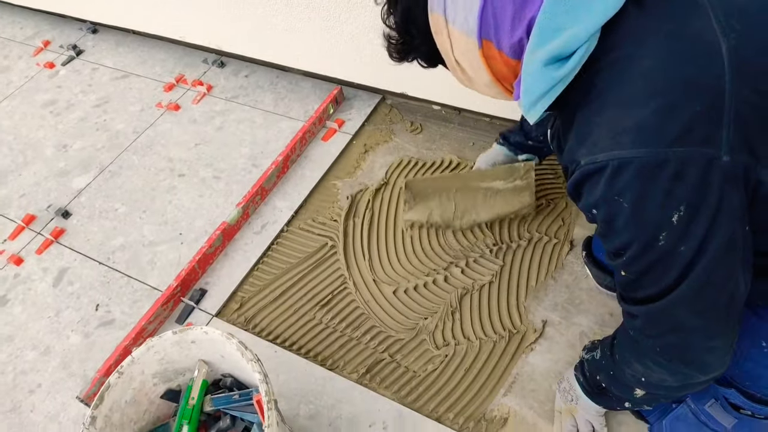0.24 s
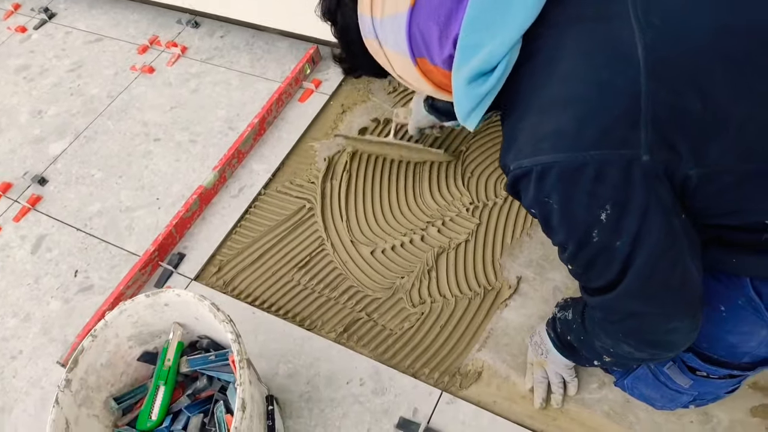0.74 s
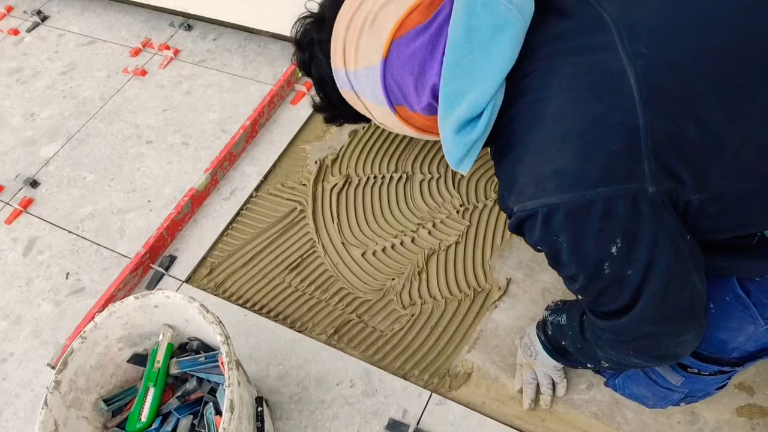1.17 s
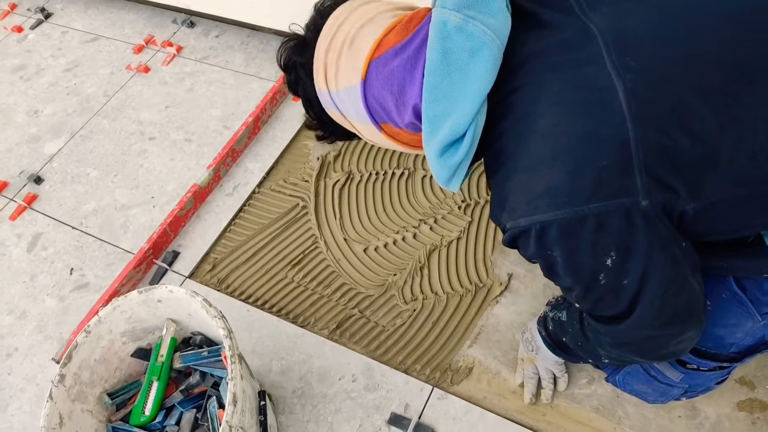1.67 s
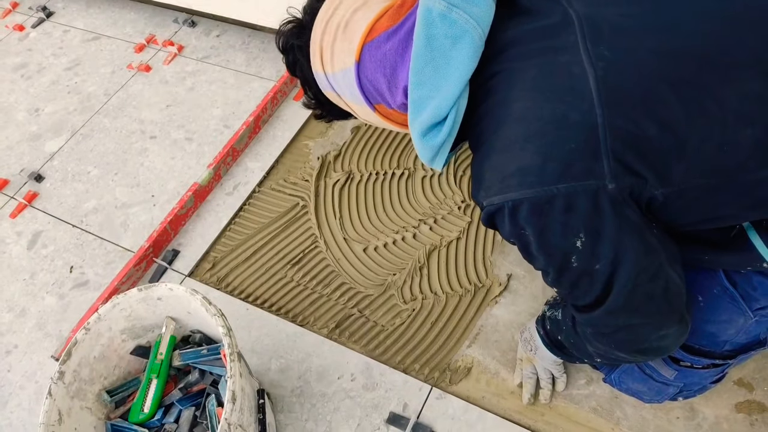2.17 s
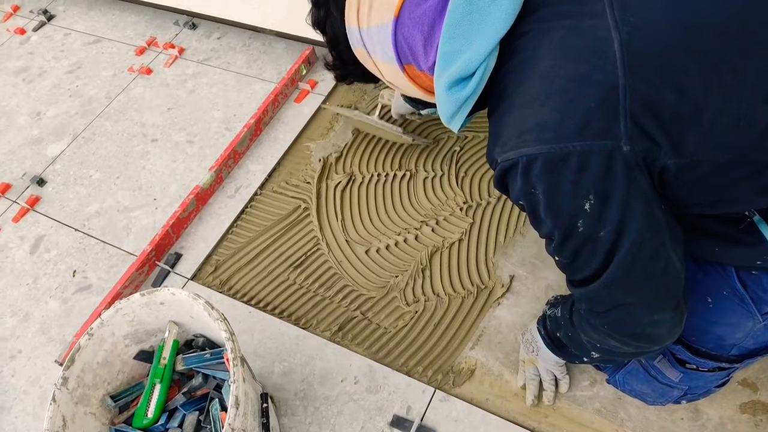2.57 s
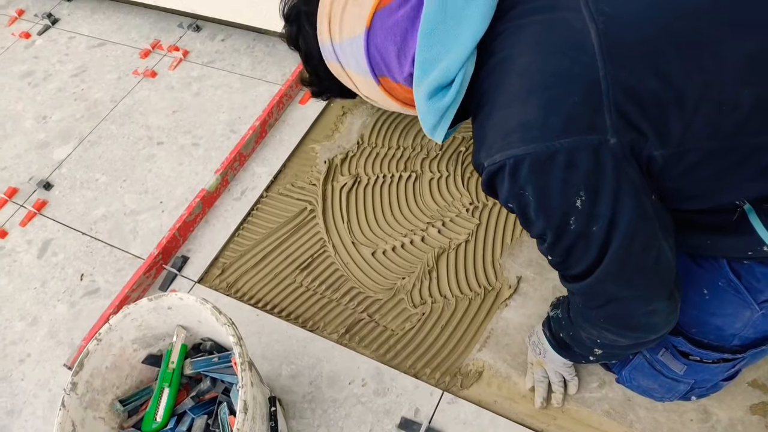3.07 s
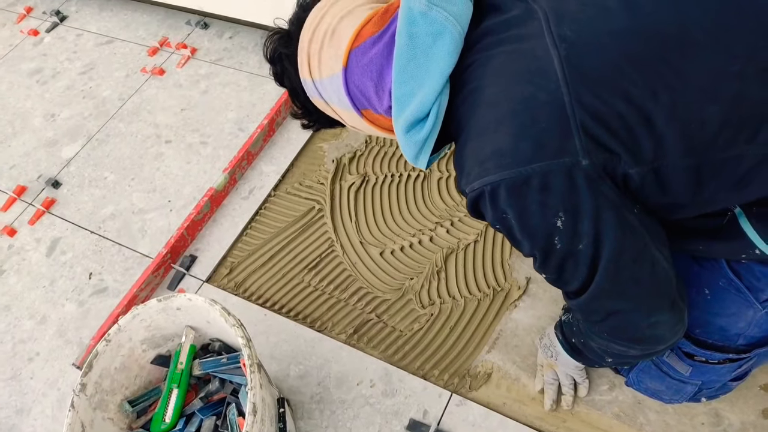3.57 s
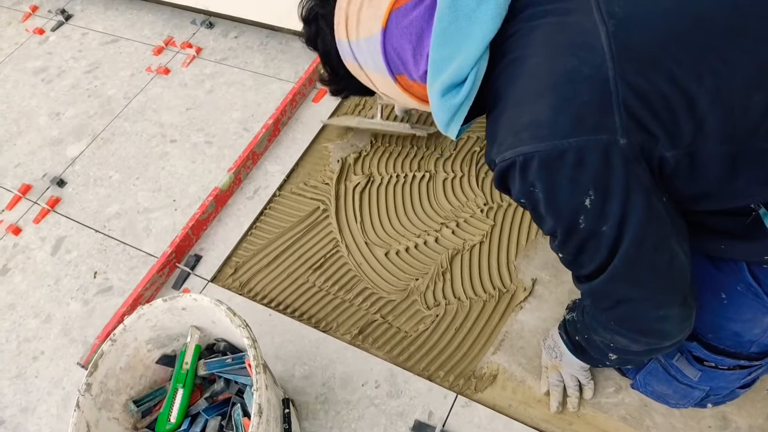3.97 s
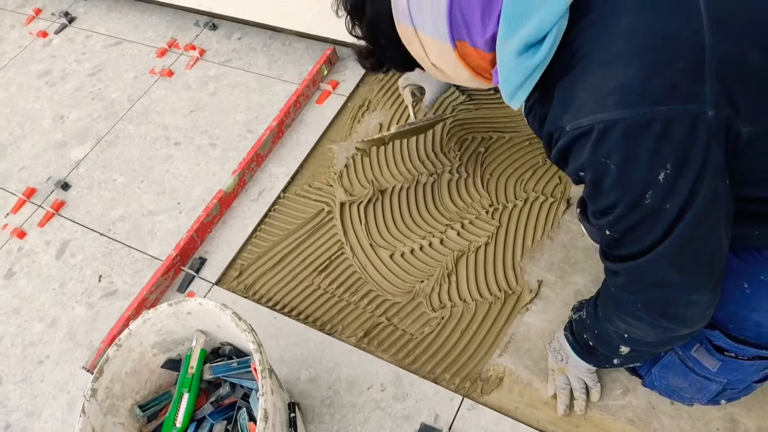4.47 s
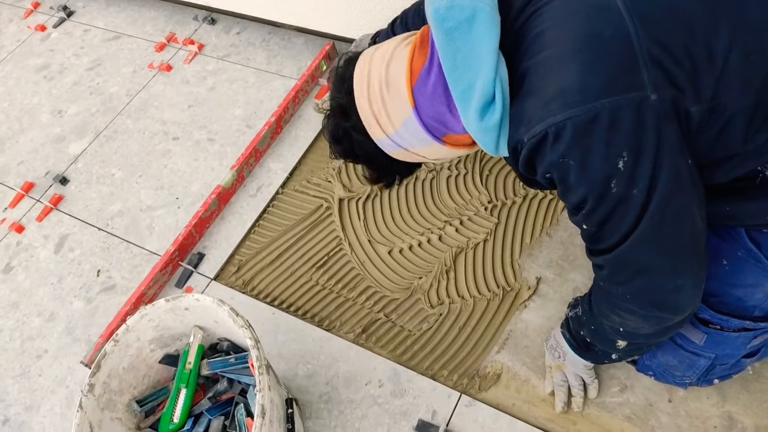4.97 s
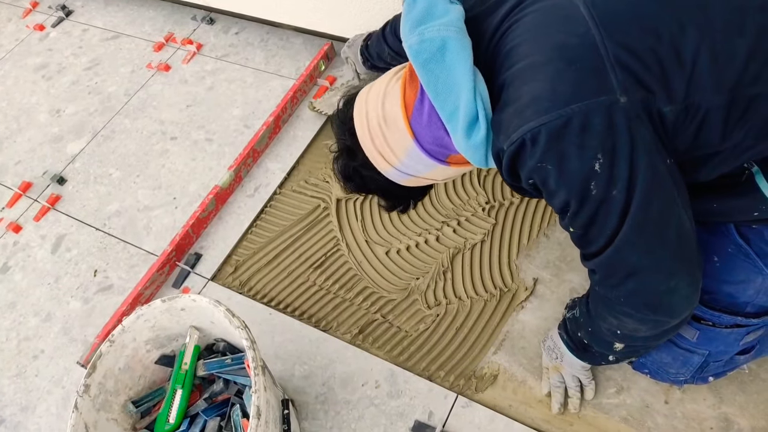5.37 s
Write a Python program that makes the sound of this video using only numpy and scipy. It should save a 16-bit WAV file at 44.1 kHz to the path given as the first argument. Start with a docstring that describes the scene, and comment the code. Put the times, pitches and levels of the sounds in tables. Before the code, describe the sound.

Sandy scraping comes in four short strokes as a toothed steel trowel spreads cement adhesive nearby, outdoors with a little echo off walls. Two strokes come first, then a pause, then two more separated by damped metal taps and scuffs. Soft low thuds accompany some taps and cluster near the end, after the teeth brush lightly over the paste. Far traffic hums underneath, with one engine briefly accelerating.

```python
"""Outdoors on a concrete floor, a two-port microphone close to a notched steel trowel, traffic far behind.
Two strokes comb gritty cement adhesive: sand hisses under the teeth, rings the blade and flexes it,
and nearby walls echo the scraping. From 1.5 to 3.1 s one engine climbs in pitch; the trowel is tapped
down at 2 s and combs again. More taps lead to a fourth stroke at 4 s, then the teeth graze lightly.
Something padded bumps the floor along with some of the taps, and several times more after 5 s."""
import sys
import numpy as np
from scipy import signal
from scipy.fft import rfft, irfft
from scipy.io import wavfile
from scipy.ndimage import uniform_filter1d

SR = 44100
rng = np.random.default_rng(int(sys.argv[2]) if len(sys.argv) > 2 else 0)


def generate_wav(signal):
    """Clip the signal to [-1, 1] and save it as 16-bit WAV at the path in sys.argv[1]."""
    frames = np.transpose(np.atleast_2d(signal))
    scaled = np.clip(frames, -1, 1) * 32767
    pcm = np.round(scaled).astype(np.int16)
    wavfile.write(sys.argv[1], SR, pcm)


N = 248283


def gain_of(db):
    return 10 ** (np.asarray(db) / 20)


def unit_rms(x):
    return x / np.sqrt(np.mean(x ** 2) + 1e-20)


def curve_at(points, hz):
    """Interpolates (hz, value) points over log frequency."""
    point_hz, value = np.transpose(points)
    return np.interp(np.log(hz + 1), np.log(point_hz + 1), value)


def envelope(rows, db):
    """Gain through one level at each row's time, silent outside the rows."""
    return gain_of(np.interp(np.arange(N) / SR, np.transpose(rows)[0], db, left=-200, right=-200))


def wander(samples):
    """Smooth random drift, rms 1."""
    span = round(samples)
    return unit_rms(uniform_filter1d(uniform_filter1d(rng.standard_normal(N), span), span))


def coloured(x, points):
    """Filters by an (hz, db) curve scaled to unit energy."""
    hz = np.fft.rfftfreq(1024, 1 / SR)
    kernel = np.roll(irfft(gain_of(curve_at(points, hz))), 512) * np.hanning(1024)
    return signal.oaconvolve(x, kernel[None] / np.linalg.norm(kernel), "same")


def ringing(modes, favoured_hz=None, reach=0.3, size=4096):
    """Modes swell over a few cycles and decay, energy 1; a blow favours those near one pitch."""
    t = np.arange(size) / SR
    hz, width, db = np.transpose(modes)[:, :, None]
    share = 1 if favoured_hz is None else np.exp(-(np.log(hz / favoured_hz) / reach) ** 2)
    decay = np.exp(-np.pi * width * t)
    amplitude = share * gain_of(db) * np.sqrt(width) * decay * (1 - decay ** 3)
    ring = (amplitude * np.sin(2 * np.pi * hz * t)).sum(0)
    return ring / np.linalg.norm(ring)


def resonate(clicks, modes):
    """Each click rings the modes."""
    return signal.oaconvolve(clicks, ringing(modes)[None])[:, :N]


def add(mix, start_s, sound):
    part = mix[..., round(start_s * SR):][..., :sound.shape[-1]]
    part += sound[..., :part.shape[-1]]


def knocks(events):
    """Places each blow at its time and peak level."""
    track = np.zeros(N)
    for start_s, peak_db, shape in events:
        add(track, start_s, gain_of(peak_db) * shape / abs(shape).max())
    return track


# spectrum of the far traffic: frequency_hz, relative_db
TRAFFIC_SPECTRUM = [(20, -8), (50, 0.5), (68, -14.5), (91, -21), (185, -6), (223, -13), (326, -16),
                    (540, -17.5), (700, -23), (1170, -24.5), (2000, -29.5), (3840, -42.5), (5300, -46),
                    (7560, -40.5), (13000, -72.5)]
def traffic(level_db=-47, patch_db=1.3):
    """Far traffic rumbles: low noise whose colour drifts in patches."""
    frames, hz = N // 512 + 5, np.fft.rfftfreq(2048, 1 / SR)
    *noise, patches = rng.standard_normal((frames, 1025, 5)).T
    patches = unit_rms(uniform_filter1d(uniform_filter1d(patches, 20, 0), 10, 1))
    spectra = np.array([noise[0] + 1j * noise[1], noise[2] + 1j * noise[3]])
    spectra *= gain_of(curve_at(TRAFFIC_SPECTRUM, hz)[:, None] + patch_db * patches)
    return gain_of(level_db) * unit_rms(signal.istft(spectra, nperseg=2048, noverlap=1536)[1][:, :N])


# one engine accelerating in the traffic: time_s, firing_hz, level_db
ENGINE_CLIMB = [(1.5, 39.9, -70), (1.73, 42.56, -58.5), (2.578, 52.43, -45.5), (3.042, 60, -50),
                (3.119, 60.5, -69)]
def engine(second_harmonic_db=-11):
    """A low firing tone and its octave climb in pitch."""
    time_s, firing_hz, level_db = np.transpose(ENGINE_CLIMB)
    phase = 2 * np.pi * np.cumsum(np.interp(np.arange(N) / SR, time_s, firing_hz)) / SR
    swell = uniform_filter1d(envelope(ENGINE_CLIMB, level_db), 3000)
    return np.sqrt(2) * swell * (np.sin(phase) + gain_of(second_harmonic_db) * np.sin(2 * phase))


# colour of the echo off nearby walls: frequency_hz, relative_db
ECHO_COLOUR = [(300, -0.5), (1000, 0.5), (2000, 3), (3300, 0.5), (7500, -4.5), (12000, -9.5)]
def wall_echo(x, level_db=-17, t60_s=0.8, gap_s=0.0099):
    """The walls throw the scraping back as a diffuse, dying tail."""
    t = np.arange(SR) / SR
    tail = rng.standard_normal((2, SR)) * gain_of(-60 * t / t60_s) * (t > gap_s)
    echo = signal.fftconvolve(x, tail / np.linalg.norm(tail[0]), axes=1)[:, :N]
    return gain_of(level_db) * coloured(echo, ECHO_COLOUR)


# modes of a padded bump: pitch_hz, width_hz, relative_db
BUMP_MODES = [(78, 25, 28), (151.6, 13.2, 21), (253, 57, 12), (344, 36, 8)]
# bumps on the floor, alike at both ports: start_s, peak_db, favoured_hz
FLOOR_BUMPS = [(1.994, -35.5, 196), (3.171, -32, 80), (3.68, -33, 79.5), (5.195, -27.5, 385),
               (5.205, -21, 241), (5.223, -36, 145), (5.24, -31.5, 211), (5.427, -37.5, 173),
               (5.444, -36, 181)]
def padded_bumps():
    """Soft blows on the floor ring low and short."""
    return knocks([(s, db, ringing(BUMP_MODES, hz, reach=0.42)) for s, db, hz in FLOOR_BUMPS])


def steel_blow(hz, crack_gain=0.35, crack_s=0.003):
    """A blow stirs many neighbouring modes, which die at once; those nearest its pitch ring on."""
    modes = FLEX_MODES + RING_MODES + RASP_MODES + BITE_MODES
    crack = ringing(modes, hz, reach=0.35, size=512) * np.exp(-np.arange(512) / SR / crack_s)
    blow = ringing(modes, hz, reach=0.036)
    add(blow, 0, crack_gain * crack / np.linalg.norm(crack))
    return blow


# the blade edge meets the floor or catches on it: start_s, skid_db, skid_s, peak_db, favoured_hz
EDGE_TAPS = [(0.134, -55, .003, -36, 340), (0.161, -55, .003, -30, 925), (0.602, -55, 0.0067, -34.5, 480),
             (0.774, -55, .003, -24.5, 290), (0.804, -55, .003, -27, 290), (0.8, -50, .003, -23, 630),
             (0.818, -52, .003, -22, 940), (0.833, -55, .003, -20.5, 920), (0.845, -48, .003, -26, 300),
             (1.971, -44, 0.0031, -29.5, 2400), (1.972, -58, .003, -26.5, 534),
             (1.98, -47, 0.0056, -25, 2046), (1.987, -64, .003, -33, 556), (1.993, -63, 0.0045, -31, 2200),
             (2.024, -63, .003, -36, 923), (2.05, -63, 0.0033, -34, 556), (2.09, -52, .003, -32, 891),
             (2.096, -66, 0.0033, -40, 940), (2.108, -70, .003, -40, 860), (2.402, -56, .003, -30, 480),
             (2.418, -40, 0.0015, -36, 366), (2.427, -55, .003, -31, 366), (2.701, -52, .003, -37, 285),
             (2.708, -52, .003, -25.5, 285), (2.729, -47, .003, -24, 630), (2.746, -50, .003, -27, 850),
             (2.755, -53, .003, -28, 1000), (2.776, -52, .003, -27.5, 630), (2.784, -50, .003, -29, 1000),
             (2.804, -55, .003, -27, 1010), (3.163, -52, 0.0045, -36, 710), (3.171, -40, 0.0018, -26, 960),
             (3.1802, -30.5, 0.0032, -23.5, 354), (3.193, -32, 0.0028, -36, 3900),
             (3.22, -42, .003, -24.5, 334), (3.247, -55, .003, -28, 1940), (3.248, -58, .003, -30, 1940),
             (3.332, -39, 0.014, -53, 1950), (3.574, -60, 0.0069, -36, 980), (3.673, -56, 0.0044, -30, 406),
             (3.676, -44.5, 0.0033, -38, 2170), (3.687, -39, 0.0057, -26, 360),
             (3.694, -50, .003, -35, 290), (3.737, -52, .003, -28, 360),
             (3.755, -45.5, 0.0044, -27.5, 1940), (4.029, -53, .003, -31, 300),
             (4.081, -50, .003, -26, 730), (4.109, -48, .003, -26, 855), (4.154, -50, .003, -27.5, 625),
             (5.259, -66, .003, -35, 740)]
def taps(left_lead_s=0.00031):
    """Single blows ring the blade, nearer the left port."""
    blows = knocks([(s, db, steel_blow(hz)) for s, _, _, db, hz in EDGE_TAPS])
    return np.array([blows, np.roll(blows, round(left_lead_s * SR))])


def skids(tick_gain=2.2, tick_s=0.002):
    """Each tap's skid envelope, and its first click of steel, sharpest when the skid is short."""
    skid, tick = np.zeros((2, N))
    t = np.arange(2600) / SR
    for start_s, db, skid_s, _, _ in EDGE_TAPS:
        add(skid, start_s, gain_of(db - 20 * (t / skid_s) ** 2))
        tick[round(start_s * SR)] = gain_of(db) * tick_gain * min(tick_s / skid_s, 1)
    return skid, tick


def grains(per_s, spread_db, chatter_db, chatter_samples):
    """Two unrelated trains of sand clicks of uneven size, clumped as the teeth chatter."""
    hit = rng.random((2, N)) < per_s / SR
    sign = rng.choice([-1., 1.], (2, N))
    size = np.minimum(rng.exponential(1, (2, N)), 5)
    return unit_rms(hit * sign * gain_of(spread_db * size + chatter_db * wander(chatter_samples)))


def patchy(x, depth_db):
    """The colour flickers in brief, random patches."""
    spectra = signal.stft(x, nperseg=512, noverlap=384)[2]
    patches = rng.standard_normal(spectra.shape[::-1][:2])
    patches = unit_rms(uniform_filter1d(uniform_filter1d(patches, 16, 0), 3, 1)).T
    return signal.istft(spectra * gain_of(depth_db * patches), nperseg=512, noverlap=384)[1][:, :N]


def bent(clicks, modes, bend=0.018, drift_s=0.04):
    """Wandering hand pressure bends the blade: neighbouring modes draw together and apart."""
    hz, width, db = np.transpose(modes)
    pressure = 1.59 * wander(drift_s * SR)
    shift = bend * (-1.) ** np.arange(len(hz))
    one_way = resonate(clicks * np.cos(pressure), np.c_[hz * (1 + shift), width, db])
    other_way = resonate(clicks * np.sin(pressure), np.c_[hz * (1 - 0.83 * shift), width, db])
    return one_way + other_way


# blade modes damped by paste: pitch_hz, width_hz, relative_db
RING_MODES = [(543, 57, 5), (627.7, 36, 10), (736, 26, 7), (845, 36, 10), (934.6, 31.4, 11), (994, 41, 8.5),
              (1062, 43, 7.5), (1172, 120, 1.5)]
# bending modes of blade and handle: pitch_hz, width_hz, relative_db
FLEX_MODES = [(225, 79, -5), (289.3, 38.5, 7), (360.5, 56, 7.5), (474, 61, 3)]
def blade(ring, flex):
    """Sand grains ring the blade and flex it."""
    rung = bent(ring * grains(4000, spread_db=1.5, chatter_db=1.2, chatter_samples=200), RING_MODES)
    flexed = bent(flex * grains(3000, spread_db=1.5, chatter_db=1.2, chatter_samples=300), FLEX_MODES)
    return patchy(rung + flexed, depth_db=0.31)


# hiss of grit under the teeth: frequency_hz, relative_db
GRIT_SPECTRUM = [(2800, -13.5), (4200, -15), (5750, -12.5), (7500, -5.5), (8370, -8), (9880, -21.5),
                 (11300, -26.5), (15400, -31.5)]
# low (rasp) and high (bite) modes of the teeth: pitch_hz, width_hz, relative_db
RASP_MODES = [(1340, 520, 12.5), (1630, 123, 4), (1930, 100, 5.5)]
BITE_MODES = [(2147, 203, 6.5), (2412, 320, 7.5), (2830, 180, 4.5), (3248, 276, 5), (3680, 310, 4.5),
              (4070, 270, 0), (4610, 230, -1), (5210, 460, 1), (5950, 510, -10.5)]
def teeth(hiss, rasp, bite, surge_db=0.78, surge_s=0.012, lowpass_hz=9500):
    """Coarse sand passes in surges, hissing and ringing the teeth."""
    skid, tick = skids()
    surge = gain_of(surge_db * wander(surge_s * SR))
    grit = patchy(grains(14000, spread_db=0.65, chatter_db=0.5, chatter_samples=150), depth_db=2.5)
    sand = patchy(grains(6000, spread_db=2.8, chatter_db=0.45, chatter_samples=150), depth_db=2.3)
    # skids and ticks are low-passed, so they sound dull
    skidding = signal.lfilter(*signal.butter(4, lowpass_hz, fs=SR), skid * grit + tick)
    hissing = coloured(hiss * surge * grit + skidding, GRIT_SPECTRUM)
    rasping = resonate(np.hypot(rasp * surge, 0.23 * skid) * sand, RASP_MODES)
    biting = resonate(np.hypot(bite * surge, 0.72 * skid) * sand + tick, BITE_MODES)
    return hissing + rasping + biting


# light touches on the paste: start_s, length_s, hiss_db
LIGHT_GRAZES = [(0.343, 0.15, -67.5), (3.367, 0.34, -65), (4.427, 0.29, -59), (4.736, 0.55, -62.5)]
def grazes(bite_offset_db=-12):
    """The teeth graze the paste: only the hiss and bite gains swell and fade."""
    gains = np.zeros((5, N))
    for start_s, length_s, db in LIGHT_GRAZES:
        swell = np.hanning(round(length_s * SR)) ** 0.34
        add(gains[::4], start_s, swell * gain_of([[db], [db + bite_offset_db]]))
    return gains


# scuffs and one bump's ring: start_s, rise_s, length_s, hiss_db, rasp_db, ring_db, flex_db, bite_db
SHORT_SCUFFS = [(0.59, 0.013, 0.05, -50.5, -50, -50, -49, -55),
                (1.968, 0.002, 0.22, -60.5, -49.5, -43, -46, -50),
                (3.165, 0.0022, 0.14, -43.5, -34, -38.5, -32.5, -40.5),
                (3.329, 0.0012, 0.098, -57, -51, -55, -49, -52),
                (3.555, 0.013, 0.064, -65, -52.5, -49, -52, -71),
                (3.672, 0.0077, 0.12, -42, -35.5, -41, -32.5, -38),
                (5.1, 0.032, 0.064, -56.5, -70, -66, -52, -60),
                (5.193, 0.0016, 0.021, -84, -64, -33.5, -40.5, -61),
                (5.224, 0.038, 0.098, -64.5, -56, -43, -43.5, -58.5),
                (5.498, 0.017, 0.073, -65.5, -76, -60, -73, -76)]
# fade over a scuff's length: hiss_db, rasp_db, ring_db, flex_db, bite_db
SCUFF_FADE = [-20, -20, -38, -20.5, -20]
def scuffs():
    """Short scuffs, and the brief ring of the floor bump at 5.2 s: gains rise, then fall ever faster."""
    gains = np.zeros((5, N))
    for start_s, rise_s, length_s, *levels_db in SHORT_SCUFFS:
        t = np.arange(0, 2 * length_s, 1 / SR)
        fade_db = np.c_[SCUFF_FADE] * (t / length_s) ** 2.33
        add(gains, start_s, np.minimum(t / rise_s, 1) * gain_of(np.c_[levels_db] + fade_db))
    return gains


# combing near the microphone, one list a stroke: time_s, hiss_db, ring_over_hiss_db, flex_over_hiss_db
COMBING_STROKES = [
    [(0.0, -39.5, -13, -12), (0.012, -31, -26, -28), (0.035, -29, -16, -30), (0.075, -30, -14, -22),
     (0.15, -35.5, -8, -2), (0.18, -43, 2, -12), (0.215, -59, -5, -5)],
    [(0.645, -61.5, -1, 16), (0.672, -39, -8.5, -6), (0.73, -35, -7.5, -9.5), (0.785, -30.5, -4, 0),
     (0.826, -31.5, -4.5, -3), (0.85, -29, -4.5, -9), (0.926, -43.5, 1.5, -7.5), (0.96, -61, 7, 13.5)],
    [(2.19, -63.5, 2, -11), (2.25, -52, 0, -2), (2.38, -38.5, -6.5, -3.5), (2.42, -40.5, 0.5, 7.5),
     (2.47, -39, -3.5, 0), (2.67, -33.5, -4.5, -9), (2.764, -29.5, -4.5, -14), (2.81, -40.5, 0, -1),
     (2.83, -51, 1, -9)],
    [(3.8, -59.5, -9, 16), (3.89, -43, -2, -4.5), (4.1, -30, -2.5, -7.5), (4.145, -27.5, -1.5, -26),
     (4.195, -38.5, 3, -25), (4.255, -46.5, -11, 1), (4.313, -45.5, 2, -12), (4.39, -69, -7, -17)],
]
def strokes(rasp_db=(-37, -37, -42, -41), bite_db=(-36, -40.5, -41.5, -41), ease_s=0.038, ease_db=-9):
    """Each stroke eases on and off the paste: gains of hiss, rasp, ring, flex and bite."""
    gains = np.zeros((5, N))
    for rows, rasp, bite in zip(COMBING_STROKES, rasp_db, bite_db):
        ease_on = np.add(rows[0], [-ease_s, ease_db, 0, 0])
        ease_off = np.add(rows[-1], [ease_s, ease_db, 0, 0])
        rows = [ease_on, *rows, ease_off]
        _, hiss, ring, flex = np.transpose(rows)
        # rasp and bite follow the hiss in part, and rise as the blade rings
        follow = 0.93 * (hiss + 35.5) + 0.97 * ring
        gains += [envelope(rows, db) for db in (hiss, rasp + follow, hiss + ring, hiss + flex, bite + follow)]
    return gains


def trowel():
    """Strokes, scuffs and grazes set how loud the teeth and blade sound."""
    hiss, rasp, ring, flex, bite = strokes() + scuffs() + grazes()
    return teeth(hiss, rasp, bite) + blade(ring, flex)


def at_ports(pair, likeness, right_lead_s=0):
    """Long waves reach both ports alike; short ones arrive scattered and unrelated."""
    hz = np.fft.rfftfreq(N + 1, 1 / SR)
    left, scattered = rfft(pair, N + 1)
    shared = np.clip(curve_at(likeness, hz), -1, 1)
    right = shared * left * np.exp(2j * np.pi * hz * right_lead_s) + np.sqrt(1 - shared ** 2) * scattered
    return irfft([left, right], N + 1)[:, :N]


# how alike the two ports hear far traffic and the near trowel: frequency_hz, likeness
FAR_LIKENESS = [(60, 0.89), (290, 0.86), (640, 0.38), (1400, 0.017), (7000, 0.077)]
NEAR_LIKENESS = [(125, 0.75), (500, 0.93), (1000, 0.63), (2000, 0.12), (6000, 0.043), (12000, 0.033)]
def scene():
    """Trowel close by, its scraping reaching the right port first; traffic and engine behind."""
    scraping = trowel()
    near = at_ports(scraping + wall_echo(scraping), NEAR_LIKENESS, right_lead_s=0.0002)
    far = at_ports(traffic(), FAR_LIKENESS) + engine()
    return far + padded_bumps() + taps() + near


# colour difference between the microphone's ports: frequency_hz, left_minus_right_db
PORT_BALANCE = [(60, 4), (250, 4.5), (700, 2.5), (2000, 3), (4400, 0.5), (7800, -8.5), (10000, 1.5),
                (14900, -1.5)]
def record(dry):
    """The two ports differ in colour; then the top of the treble is cut."""
    lean_db = curve_at(PORT_BALANCE, np.fft.rfftfreq(N + 1, 1 / SR)) / 2
    heard = irfft(rfft(dry, N + 1) * gain_of([lean_db, -lean_db]), N + 1)[:, :N]
    lowpass = signal.firwin(1023, cutoff=15480, window=("kaiser", 9), fs=SR)
    return signal.oaconvolve(heard, lowpass[None], "same")


dry = scene()
out = record(dry)
generate_wav(out)
```